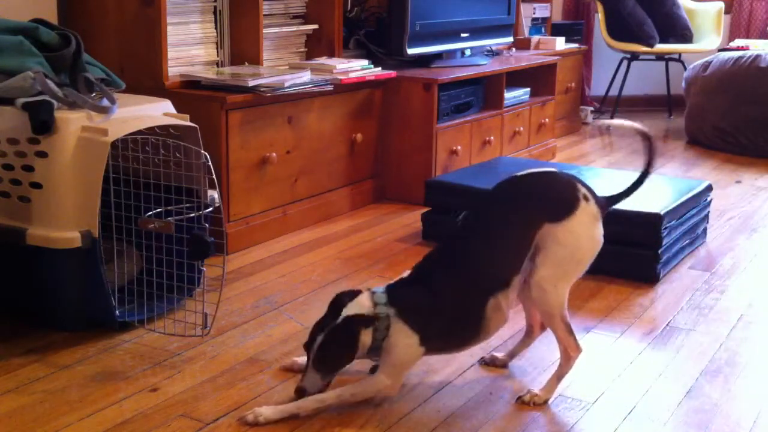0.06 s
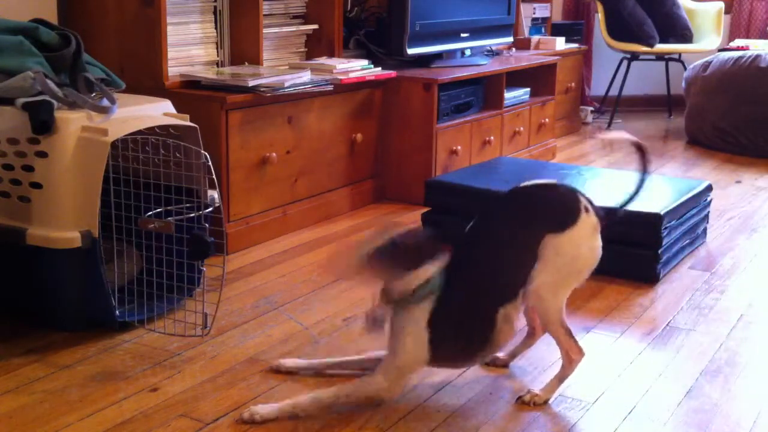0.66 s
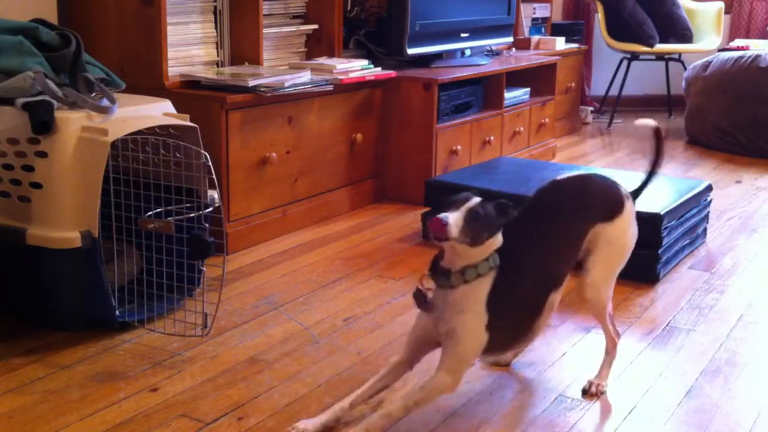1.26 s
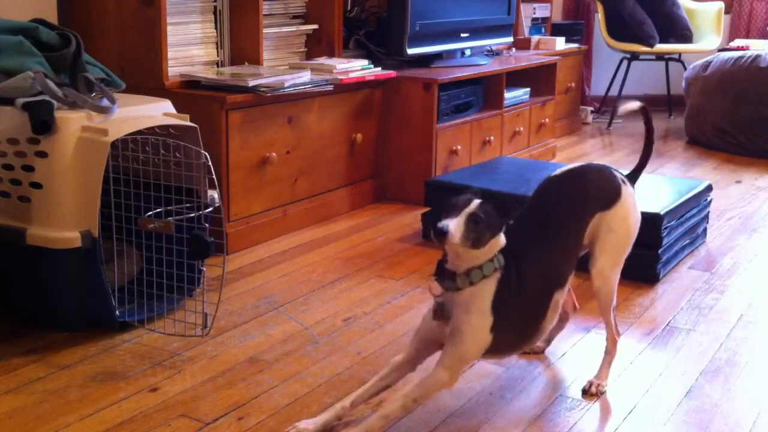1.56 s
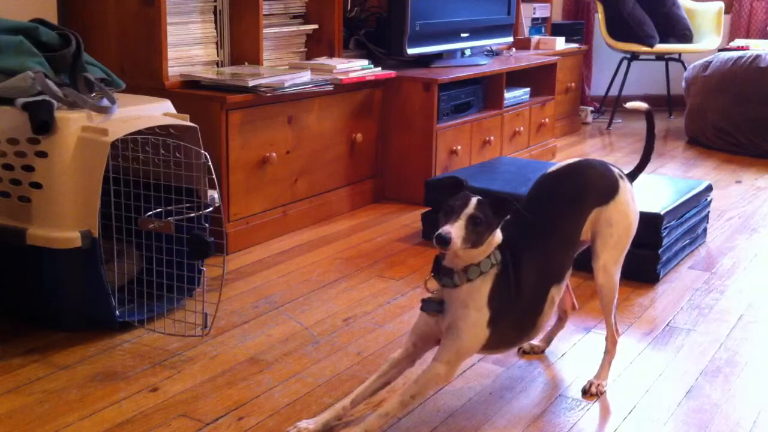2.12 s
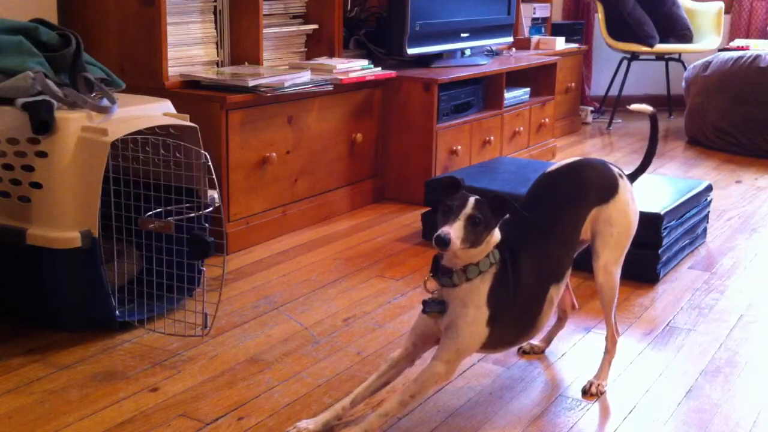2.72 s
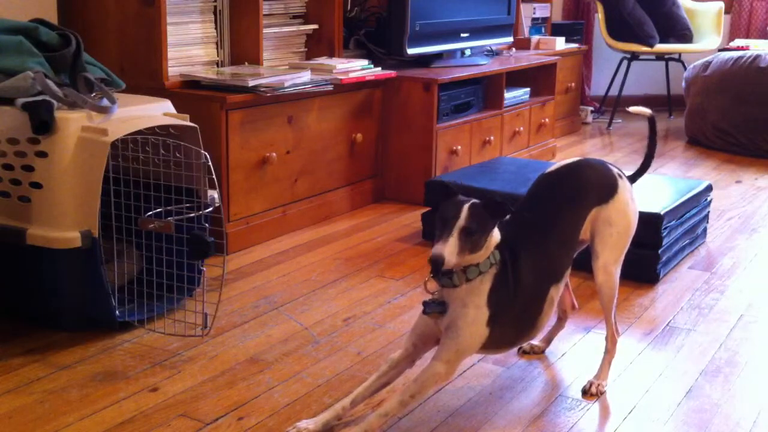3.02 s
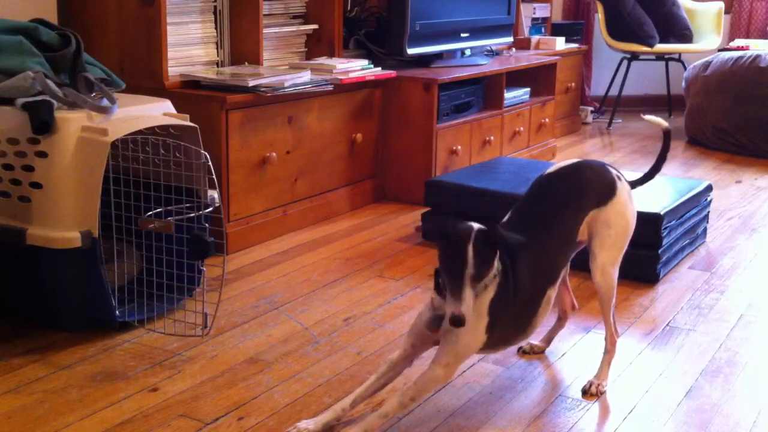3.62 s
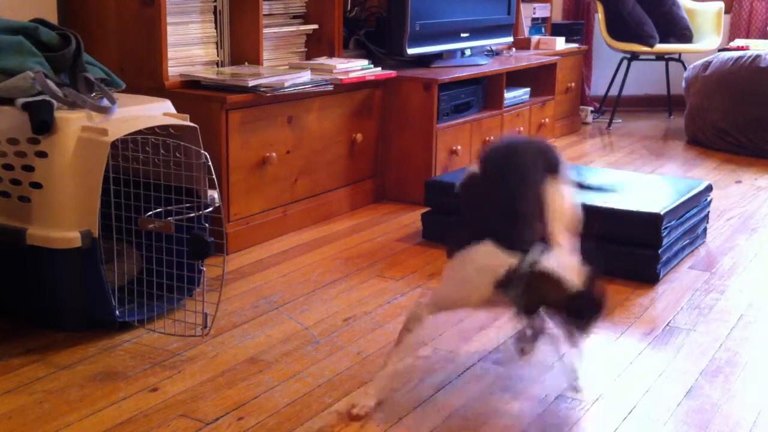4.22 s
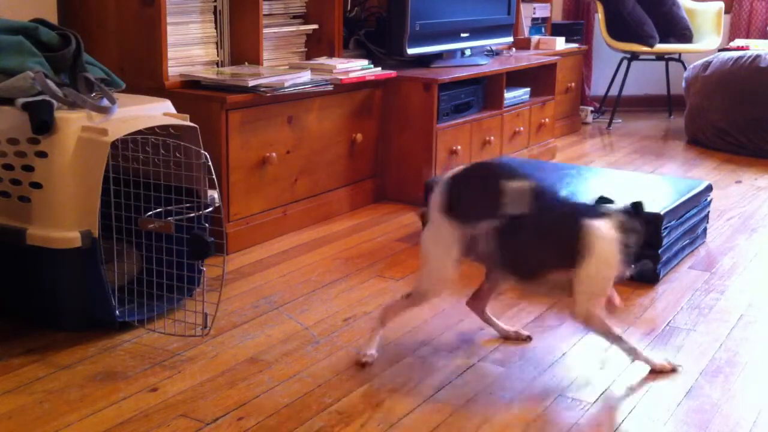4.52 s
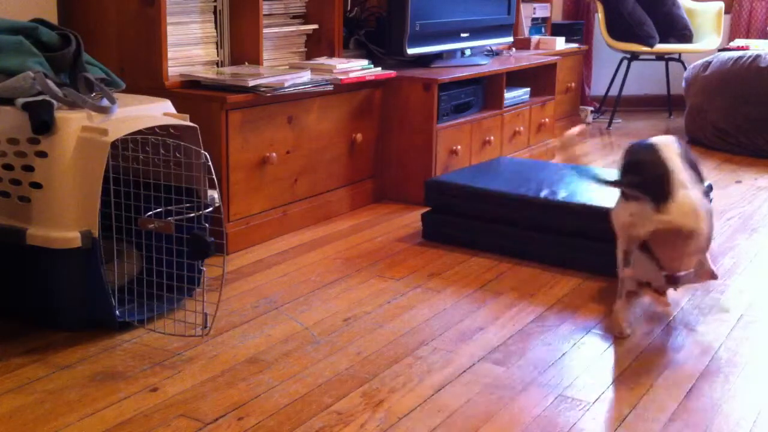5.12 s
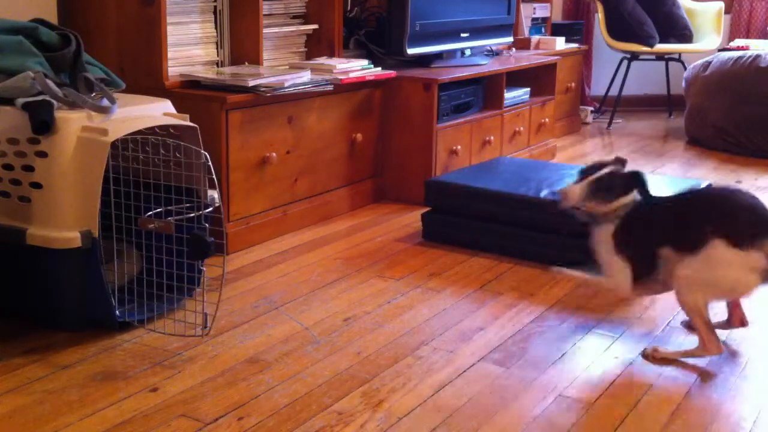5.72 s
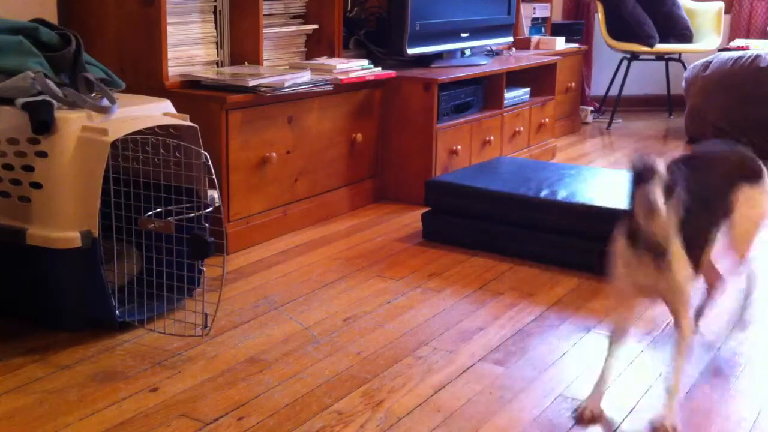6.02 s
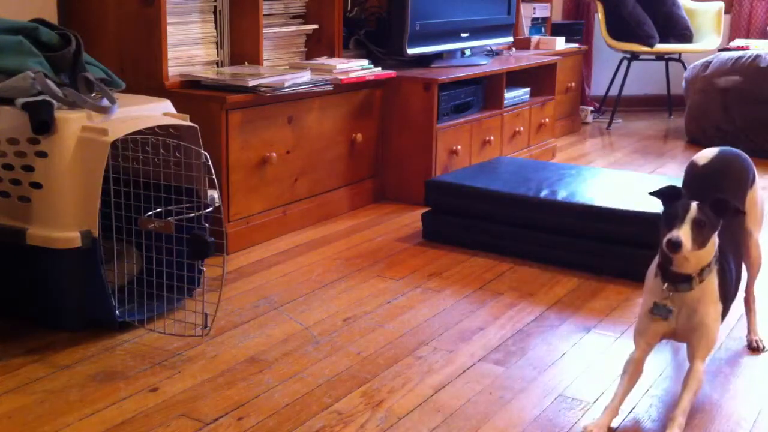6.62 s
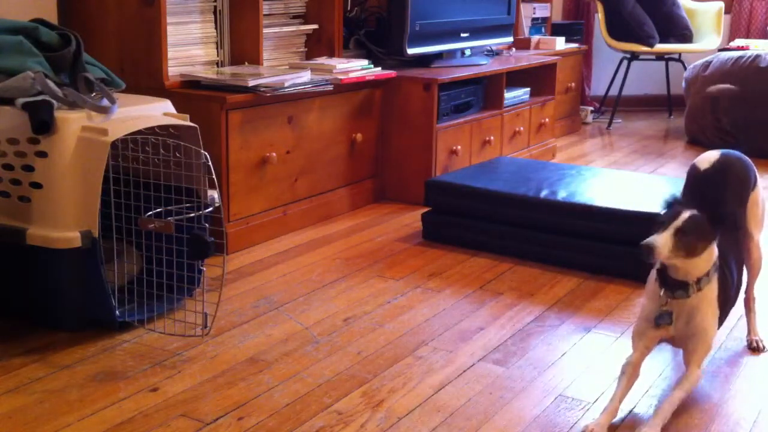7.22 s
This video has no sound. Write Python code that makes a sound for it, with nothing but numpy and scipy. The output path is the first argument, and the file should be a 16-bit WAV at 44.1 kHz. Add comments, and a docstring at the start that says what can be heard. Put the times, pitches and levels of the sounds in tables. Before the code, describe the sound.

In a quiet living room, a dog's paws land on wooden boards with a low thud and sharp claw clicks. A lull follows, with only sparse ticks and soft fur rustle. Past the middle comes a busy run of taps, thumps and rasping slides, mixed with the bright jingle of a metal collar tag. The steps thin out near the end. Each sound has a short room echo over faint background hiss.

```python
"""Claws click and paws thump on a hardwood floor as a small dog play-bows, pounces and spins.
Each nail taps and rings briefly, each soft pad sets the boards booming, and sliding paws rasp.
The tag on the collar jingles against its ring, fur rustles, and a small metal fitting clinks once.
The living room echoes briefly over a faint rumble and hiss."""
import sys
import numpy as np
from scipy import signal
from scipy.fft import rfft, irfft, next_fast_len
from scipy.io import wavfile
from scipy.ndimage import uniform_filter1d, map_coordinates

SR = 44100
rng = np.random.default_rng(int(sys.argv[2]) if len(sys.argv) > 2 else 0)


def to_wav(s):
    """Save 16-bit WAV."""
    ch = np.atleast_2d(s).T  # columns
    pcm = np.round(np.clip(ch, -1, 1) * 32767)  # PCM
    wavfile.write(sys.argv[1], SR, pcm.astype(np.int16))


N = 324576
SIZE = 10240  # samples in one short sound
T = np.arange(SIZE) / SR  # its time axis in seconds
HZ = np.fft.rfftfreq(SIZE, 1 / SR)  # its frequency axis


def amp(db):
    """Turn decibels into a gain."""
    return np.exp(np.asarray(db) * np.log(10) / 20)


def norm(x):
    """Scale a sound to an energy of 1."""
    return x / np.sqrt(np.sum(x ** 2) + 1e-20)


def curve_at(points, hz):
    """Read a curve of (pitch_hz, level_db) points on a log-frequency axis."""
    pitch_hz, level_db = np.transpose(points)
    return np.interp(np.log(hz + 1), np.log(pitch_hz + 1), level_db)


def hump(hz, centre_hz, octaves):
    """A bell curve of height 1 around one pitch."""
    return np.exp(-.5 * (np.log2((hz + 1) / centre_hz) / octaves) ** 2)


def resonance_db(hz, centre_hz, peak_db, q):
    """A ringing peak above a flat response; a higher q makes it narrower."""
    bell = 1 / (1 + (q * (hz / centre_hz - centre_hz / (hz + 1))) ** 2)
    return 10 * np.log10(1 + amp(peak_db) ** 2 * bell ** 2)


def shape_burst(burst, tone_db):
    """Even out a short burst's tone, then give it a new one."""
    spectrum = rfft(burst)
    power = np.abs(uniform_filter1d(np.abs(spectrum) ** 2, size=58))
    own_tone = np.sqrt(power + power.mean() / 20)
    cepstrum = irfft(np.log(amp(tone_db) / own_tone))
    # fold the filter forward in time, so nothing sounds before the blow
    cepstrum[1:SIZE // 2] *= 2
    cepstrum[SIZE // 2 + 1:] = 0
    return norm(irfft(spectrum * np.exp(rfft(cepstrum))))


def shape_noise(noise, tone):
    """Give a scene-long noise a tone curve and an average (rms) level of 1."""
    gain = amp(curve_at(tone, np.fft.rfftfreq(N, 1 / SR)))
    return norm(irfft(rfft(noise) * gain, N)) * np.sqrt(N)


def grit(spiky_db, size):
    """Many tiny contacts of uneven strength; none catches harder than the grip allows."""
    strength = np.minimum(rng.standard_normal(size // 16 + 1), 2)
    return rng.standard_normal(size) * amp(spiky_db * np.repeat(strength, 16)[:size])


def contact(scatter_s, spiky_db):
    """A quickly fading chatter; the more scattered the landing, the softer its start."""
    age = (T[:SIZE // 4] + 1 / SR) / max(scatter_s, 1e-4)
    chatter = grit(spiky_db, len(age)) * np.exp(-age) * (1 - np.exp(-age / 0.32))
    return norm(np.pad(chatter, (0, SIZE - len(age))))


def fade_in(rise_s):
    """A gain that climbs from 0 towards 1."""
    return 1 - np.exp(-T / rise_s)


def ringing(tones, vary_db, detune):
    """A struck object's tones, a little different at each hit; each falls 60 dB in its fade_s."""
    pitch_hz, level_db, fade_s = np.transpose(tones)[:, :, None]
    strength, shift = rng.standard_normal((2,) + pitch_hz.shape)
    phase = 2 * np.pi * pitch_hz * (1 + detune * shift) * T
    envelope = amp(level_db + vary_db * strength - 60 * T / fade_s)
    return np.sum(envelope * np.sin(phase.astype(np.float32)), axis=0)


def rattle(rate_hz, depth):
    """Loose metal keeps touching its neighbour, which roughens its ring."""
    return 1 + depth * map_coordinates(rng.standard_normal(SIZE // 16), [T * rate_hz])


def room(sound, tail_db, near_db):
    """Add quick reflections off floor and furniture, and an echo tail that is new for every spot."""
    dull_fade_s, bright_fade_s, split_hz = 0.36, 0.33, 7000
    noise = rng.standard_normal(SIZE)
    dull = signal.lfilter(*signal.butter(1, split_hz, fs=SR), noise)
    tail = dull * amp(-60 * T / dull_fade_s) + (noise - dull) * amp(-60 * T / bright_fade_s)
    tail = norm(tail * fade_in(rise_s=0.0032))
    near = norm(rng.standard_normal(SIZE) * np.exp(-np.minimum(T / 0.0055, 20)))
    return sound + signal.fftconvolve(sound, amp(near_db) * near + amp(tail_db) * tail)[:len(sound)]


def add(track, start_s, level_db, sound):
    """Lay a sound on the track; its level is its energy spread over a twentieth of a second."""
    part = track[max(round(start_s * SR), 0):][:SIZE]
    part += (amp(level_db) * np.sqrt(SR / 20) * norm(sound))[:len(part)]


def background():
    """The steady low murmur of the house and a soft hiss."""
    # tone of the quiet room: pitch_hz, level_db
    murmur_tone = [(15, -45), (25, -25), (33, -43), (102, -21), (212, -5.5), (263, -16), (405, -13),
                   (624, -24), (818, -23.5), (936, -18.5), (1480, -23), (2050, -25.5), (3920, -24.5),
                   (6920, -29), (16000, -30.5)]
    return amp(-68.0) * shape_noise(rng.standard_normal(N), murmur_tone)


def shuffle():
    """Faint ticks and rustle while the dog shifts its weight."""
    # how restless the feet and fur are: time_s, relative_level_db
    restlessness = [(0, -65), (.42, -70.5), (.65, -66.5), (.9, -60.5), (1.3, -70.5), (1.7, -72.5),
                    (2.6, -74.5), (2.8, -68), (3.2, -64), (3.65, -73), (3.82, -64), (4.15, -62),
                    (4.4, -54.5), (4.8, -58), (6.0, -63.5), (6.3, -58.5), (6.5, -68.5), (7.1, -73.5),
                    (7.36, -64)]
    # tone of the rustle: pitch_hz, level_db
    fur_tone = [(30, -37), (100, -6), (220, 11), (500, 2), (1400, 1), (3000, -4.5), (7000, -6.5),
                (12000, -7.5), (16000, -10.5)]
    level_db = np.interp(np.arange(N) / SR, *np.transpose(restlessness))
    rustle = shape_noise(grit(spiky_db=4, size=N), fur_tone)
    return room(amp(level_db - 2.5) * rustle, tail_db=1.0, near_db=-3)


def clink():
    """A small metal fitting clinks once and rings on, lower and longer than the tag."""
    # tones of the fitting: pitch_hz, level_db, fade_s
    fitting_tones = [(1006, -5, .15), (1546, -12, 0.18), (4118, -2.5, 0.13), (3940, -5, 0.15),
                     (5460, -1, 0.18), (5430, -6, .2), (6800, -9, .15)]
    track = np.zeros(N)
    metal = ringing(fitting_tones, vary_db=4.0, detune=0.002) * rattle(rate_hz=195, depth=1.0)
    add(track, start_s=1.5, level_db=-56.5, sound=room(metal, tail_db=2, near_db=-3))
    return track


def skids():
    """A sliding paw catches on the wood grain many times within one swelling stroke."""
    # slides over the varnish: start_s, length_s, level_db, rasp_hz, rasp_db
    slides = [(0.382, 0.033, -66.5, 2060, 31), (0.732, 0.034, -60.5, 1860, 34),
              (0.809, 0.067, -51.5, 1120, 18.5), (2.668, 0.033, -52.5, 700, 24),
              (2.853, 0.053, -62, 1200, 16), (4.287, 0.082, -48, 1480, 16), (4.463, 0.093, -47, 1600, 0),
              (4.888, 0.053, -42, 1500, -15), (5.671, 0.047, -44.5, 806, 31), (5.726, 0.034, -51, 1220, 15),
              (5.797, 0.13, -53.5, 1500, 11), (6.262, 0.093, -47, 2000, -14), (7.034, 0.049, -41, 1430, 26),
              (7.112, 0.07, -49.5, 1710, 15)]
    # tone of the scraping: pitch_hz, level_db
    rasp_tone = [(30, -22), (120, -6), (400, 4), (1000, 3), (5000, 5), (9000, 8.5), (13000, -0.5),
                 (16000, -7)]
    track = np.zeros(N)
    for start_s, length_s, level_db, rasp_hz, rasp_db in slides:
        stroke = np.sin(np.pi * np.clip(T / length_s, 0, 1)) * grit(spiky_db=4, size=SIZE)
        tone_db = curve_at(rasp_tone, HZ) + resonance_db(HZ, rasp_hz, rasp_db, q=0.73)
        add(track, start_s, level_db, room(shape_burst(stroke, tone_db), tail_db=4.5, near_db=4.0))
    return track


def tag_contacts():
    """At each jolt the tag strikes, then swings back and strikes more softly."""
    # jolts of the collar: start_s, level_db, scatter_s, ring_share (0 all tag, 1 all ring)
    jolts = [(.271, -68, 0.0013, 0.4), (1.1663, -59, 0.00049, .7), (1.369, -64, .0023, 0.7),
             (1.807, -67, 0.0013, .8), (4.3241, -38, .004, 0), (4.415, -50, 0.0089, .6),
             (4.522, -45, .008, .3), (4.762, -52.5, .0053, .85), (4.914, -40.5, 0.01, 0.07),
             (5.057, -46, .0008, 0.94), (5.221, -50, .0033, 0.07), (6.278, -50, .004, 0.7),
             (6.342, -60, .002, 0.1)]
    for start_s, level_db, scatter_s, ring_share in jolts:
        yield start_s, level_db, scatter_s, ring_share
        yield start_s + .03, level_db - 5.5, scatter_s, ring_share


def collar():
    """Tag and ring chatter against each other: sharp ticks, while their ringing builds up and fades."""
    # tones of the metal tag: pitch_hz, level_db, fade_s
    tag_tones = [(6660, -0.5, 0.12), (7040, -2, 0.062), (7500, -14, 0.055), (8280, 3, 0.026),
                 (8680, 13.5, 0.034), (10760, -0.5, .09), (10900, -11, .05), (11840, 4, 0.044),
                 (12240, 0, 0.055), (12400, -20, .06), (13500, 9, .05), (14300, -15, .08),
                 (14740, -20, .07), (15300, -15, .07)]
    # tones of the ring it hangs on: pitch_hz, level_db, fade_s
    ring_tones = [(3280, 1, 0.073), (3400, -9, 0.14), (7520, -13.5, 0.54), (9500, -28, 0.26),
                  (9450, -6, 0.084), (11100, -18, .08), (12550, -24, .08), (14100, -6, 0.074),
                  (14000, 3, 0.09)]
    tick_db = curve_at(
        [(100, -18), (4500, -20), (6500, -6.5), (8500, -5.5), (14000, -1.5), (16000, -15)], HZ)
    track = np.zeros(N)
    for start_s, level_db, scatter_s, ring_share in tag_contacts():
        tag, ring = (norm(ringing(tones, vary_db=1.5, detune=0.008) * rattle(rate_hz=275, depth=1.0))
                     for tones in (tag_tones, ring_tones))
        metal = (np.sqrt(1 - ring_share) * tag + np.sqrt(ring_share) * ring) * fade_in(scatter_s)
        tick = shape_burst(contact(scatter_s, spiky_db=4), tick_db)
        add(track, start_s, level_db, room(norm(metal) + amp(1.5) * tick, tail_db=-1.5, near_db=-8))
    return track


def pad_contacts(middle_step_db):
    """Each paw presses the floor twice: the pad first, then the body's weight with a lower boom."""
    # paws landing on the boards: start_s, level_db, boom_hz
    steps = [(.112, -59, 257), (.69, -63.5, 335), (0.9298, -35.5, 250), (1.054, -49, 208),
             (1.341, -62.5, 230), (2.672, -50.5, 350), (2.826, -62, 310), (2.958, -62.5, 266),
             (3.24, -62, 243), (3.504, -62, 354), (3.769, -61.5, 295), (4.112, -60, 292),
             (4.216, -58.5, 287), (4.41, -47.5, 241), (4.481, -50, 220), (4.542, -43, 238),
             (4.643, -47, 237), (4.869, -55, 210), (4.923, -43.5, 216), (5.122, -49.5, 224),
             (5.311, -53.5, 240), (5.361, -52, 182), (5.688, -60, 322), (5.763, -57, 216),
             (5.832, -57, 205), (6.134, -41.5, 225), (6.297, -55, 215), (6.61, -66, 285), (6.996, -57, 230),
             (7.307, -57.5, 286)]
    for start_s, level_db, boom_hz in steps:
        stiffness_db = 20 * np.log2(boom_hz / 248)  # a stiff spot booms higher and knocks harder
        squash_db = 0.17 * (level_db - middle_step_db)  # a heavy step squashes the pad: less knock
        knock_db, weight_knock_db = 0.5 + stiffness_db - squash_db, -6
        yield start_s, level_db, boom_hz, knock_db
        yield start_s + .022, level_db - 6.5, 0.883 * boom_hz, weight_knock_db


def paws():
    """A pad knocks dully and sets the boards booming; where it lands picks the strongest tones."""
    # tones of the floorboards: pitch_hz, level_db, fade_s
    board_tones = [(117, -15, 0.059), (155, -5, 0.83), (183.3, 3, 0.29), (210.3, -0.5, 0.23),
                   (245.5, 3, 0.24), (267, 3, 0.21), (294.3, 5, 0.13), (358, 2, 0.25), (423, 23, 0.05)]
    # tone of a pad's knock: pitch_hz, level_db
    knock_tone = [(30, -37), (100, -16), (250, 1), (500, -0.5), (900, -1), (1300, -7), (2200, -18),
                  (5000, -52), (16000, -41)]
    middle_step_db, flex_fade_s = -53, 0.063
    pad_db = curve_at(knock_tone, HZ)
    track = np.zeros(N)
    for start_s, level_db, boom_hz, knock_db in pad_contacts(middle_step_db):
        tones = [(hz, db + 14 * hump(hz, boom_hz, octaves=0.21), fade_s)
                 for hz, db, fade_s in board_tones]
        boom = norm(ringing(tones, vary_db=3.5, detune=0.026) * fade_in(rise_s=0.0067))
        knock = shape_burst(contact(scatter_s=0.005, spiky_db=1.5), pad_db)
        knock = norm(room(knock, tail_db=5.0, near_db=-7.0))
        # the board right under the paw flexes briefly, more so under a heavy step
        flex = norm(ringing([(boom_hz, 0, flex_fade_s)], vary_db=0, detune=0) * fade_in(rise_s=0.0053))
        flex_db = -5.5 + 0.3 * (level_db - middle_step_db)
        add(track, start_s, level_db, boom + amp(flex_db) * flex + amp(knock_db) * knock)
    return track


def nail_contacts():
    """A foot lands with one nail, then a softer one, then dragging toes; lone tips also touch."""
    # claws meeting the floor, plus one thin, high tick of the collar (the first row):
    # start_s, level_db, scatter_s, ring_hz, ring_db, bright_db
    clicks = [(0.4887, -57.5, 0.0011, 9000, 5, 29), (.692, -58, .003, 980, 16.5, -10),
              (0.928, -38.5, 0.0041, 754, -24, 0.5), (1.0493, -43, 0.0028, 1760, 15, -1),
              (1.496, -51, 0.0042, 1550, 13.5, -5), (2.656, -63, 0.0023, 1100, 19, -11),
              (2.6703, -49, .002, 900, 31, -9), (2.811, -65, .0015, 990, 35, -5),
              (2.959, -74, 0.0016, 890, 28, -8), (3.506, -42, 0.0009, 6340, 6.5, -12),
              (3.641, -51.5, 0.0021, 2250, 2, -8), (4.211, -58.5, 0.0028, 1080, 29, -1),
              (4.258, -56, 0.0084, 1800, -1, -14), (4.304, -51, .0048, 1190, 22, 8),
              (4.369, -42.5, 0.0028, 1570, 16, -7.5), (4.462, -42, 0.0036, 1710, 12, -4.5),
              (4.536, -38.5, 0.0053, 1100, 9.5, -7), (4.548, -41, 0.00044, 900, 4, 35),
              (4.639, -44.5, 0.0024, 1590, 11, 3), (4.736, -54.5, 0.0042, 1410, -3, -2),
              (4.868, -52.5, 0.0044, 1380, 13.5, 2), (4.919, -40.5, 0.0037, 1140, 16, -3.5),
              (5.1218, -48.5, 0.0042, 1200, -4, 3.5), (5.152, -52.5, 0.002, 1400, 9, -1),
              (5.303, -56.5, 0.0013, 1260, 42, -3), (5.354, -50, 0.0027, 1230, 9, -4.5),
              (5.684, -56, 0.0016, 864, 33, -1), (5.7217, -42.5, 0.002, 5540, 5, -2.5),
              (5.768, -48, 0.0033, 1280, 8, -8), (5.82, -53, 0.0041, 1300, -6, -2),
              (6.121, -46, 0.0086, 980, 14, -6.5), (6.2399, -48.5, 0.0036, 1700, 9, -4),
              (6.287, -44.5, 0.0022, 1720, 2, -10), (6.608, -61.5, 0.0015, 1380, 13, -15),
              (6.746, -69.5, 0.0018, 980, 23, 6), (6.986, -61.5, 0.0016, 1080, 52, -8)]
    # single nail tips touching lightly: start_s, level_db
    tips = [(3.775, -58), (3.825, -56.5), (3.839, -57.5), (3.873, -62), (3.898, -64.5), (3.935, -62),
            (3.989, -64), (3.999, -58), (4.01, -63), (4.048, -64), (7.276, -62.5)]
    flat_landing_s, drag_scatter_s = 0.0023, 0.014
    for start_s, level_db, scatter_s, ring_hz, ring_db, bright_db in clicks:
        yield start_s, level_db, scatter_s, ring_hz, ring_db, bright_db
        yield start_s + 2.6 * scatter_s, level_db - 6.5, scatter_s, ring_hz, 0.66 * ring_db, bright_db
        # a flat landing (long scatter) drags fully, a quick peck hardly at all
        flatness = np.clip(scatter_s / flat_landing_s, .01, 1)
        drag_db = level_db - 6.5 + 20 * np.log10(flatness)
        yield start_s + .028, drag_db, drag_scatter_s, ring_hz, 0.2 * ring_db, bright_db
    scatter_s, ring_hz, ring_db, bright_db = 0.00097, 2040, 6.5, -12.5
    for start_s, level_db in tips:
        yield start_s, level_db, scatter_s, ring_hz, ring_db, bright_db


def claws():
    """Nails land in a quick scatter; each spot rings at its own pitch, and a glancing tap is bright."""
    # tone of a nail's click: pitch_hz, level_db
    click_tone = [(30, -9), (100, -29), (300, -4.5), (800, -1), (2500, -0.5), (4000, 2), (5800, 2),
                  (8000, 2.5), (11000, 4.5), (14000, -1), (16000, -8)]
    click_db = curve_at(click_tone, HZ)
    treble = hump(HZ, centre_hz=13100, octaves=0.87)
    track = np.zeros(N)
    for start_s, level_db, scatter_s, ring_hz, ring_db, bright_db in nail_contacts():
        q = 1.21 * (ring_hz / 1000) ** 0.55  # a high ring is narrower than a low one
        tone_db = click_db + resonance_db(HZ, ring_hz, ring_db, q) + bright_db * treble
        tap = shape_burst(contact(scatter_s, spiky_db=3.0), tone_db)
        # a hollow knock has less echo than a plain click
        add(track, start_s, level_db, room(tap, tail_db=-0.5 - 0.16 * ring_db, near_db=-3.5))
    return track


def scene():
    """The dog and the quiet room, mixed into one channel."""
    return (claws() + paws() + collar() + clink() + skids() + shuffle() + background())[None]


def record(dry):
    """Cut away the very highest treble."""
    top_hz = 15900
    size = next_fast_len(N + SIZE)
    audible = np.fft.rfftfreq(size, 1 / SR) < top_hz
    return irfft(rfft(dry, size) * audible, size)[:, :N]


dry = scene()
out = record(dry)
to_wav(out)
```